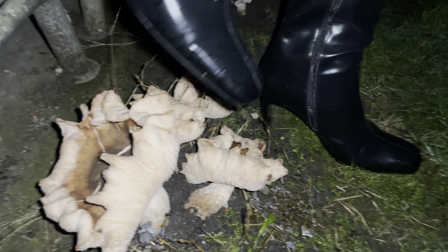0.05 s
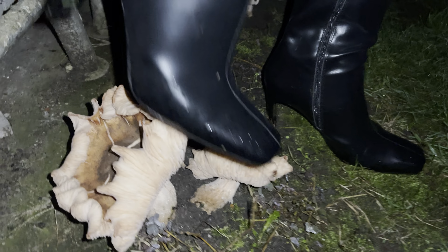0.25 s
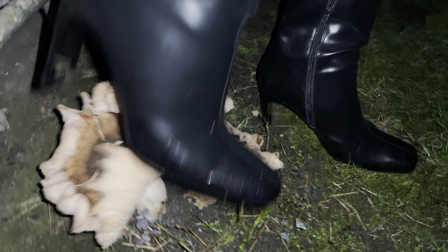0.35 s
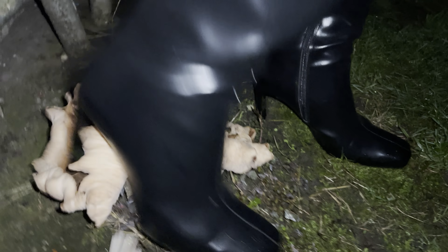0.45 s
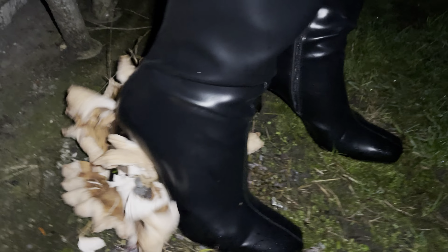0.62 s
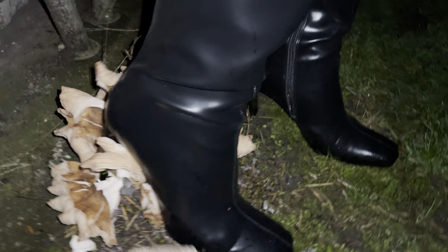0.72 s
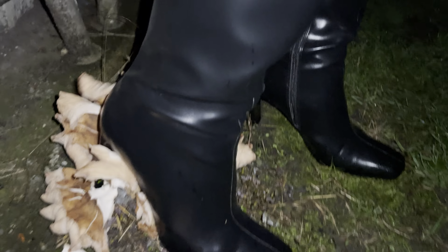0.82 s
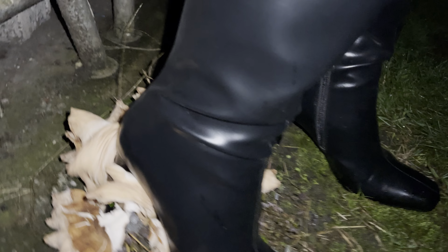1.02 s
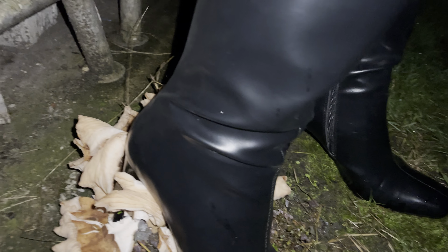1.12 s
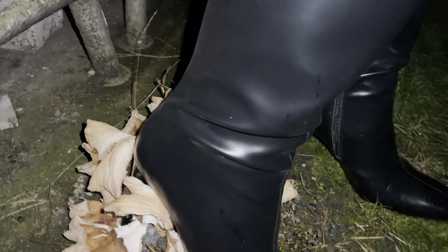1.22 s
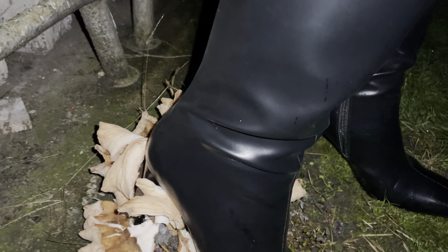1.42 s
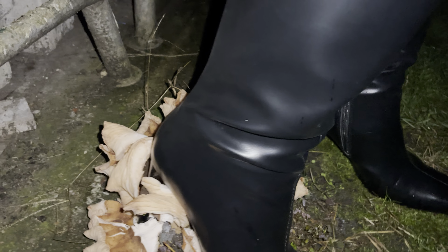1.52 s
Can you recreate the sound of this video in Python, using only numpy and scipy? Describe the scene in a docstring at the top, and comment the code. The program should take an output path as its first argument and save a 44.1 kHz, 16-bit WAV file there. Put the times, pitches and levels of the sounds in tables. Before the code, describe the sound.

One close boot step squashes mushrooms with a juicy, popping crunch. A light rustle of clothing comes first, and stalks and grit tick as the foot settles, with a faint outdoor rumble and hum underneath.

```python
"""Leather and cloth rustle over a low outdoor rumble and hum as a boot swings in, close by.
The sole touches a clump of big soft mushrooms, then the full weight crushes them: flesh tears in a
dense wet crunch, juice squelches in tiny bubbles, and caps burst with dull pops of trapped air.
The weight thuds into the soil, stalks and grit snap as the foot settles, and walls echo faintly."""
import sys
import numpy as np
from scipy import signal
from scipy.fft import rfft, irfft, next_fast_len
from scipy.io import wavfile

SR = 44100
rng = np.random.default_rng(int(sys.argv[2]) if len(sys.argv) > 2 else 0)


def file_out(sig):
    """Save sig as 16-bit WAV at sys.argv[1]."""
    # one column per channel
    cols = np.atleast_2d(sig).T
    # limit, then scale
    lim = np.clip(cols, -1, 1)
    pcm = np.round(lim * 32767).astype(np.int16)
    wavfile.write(sys.argv[1], SR, pcm)


N = 68355
TIME = np.arange(N) / SR


def from_db(db):
    """Decibels to gain."""
    return 10 ** (np.asarray(db) / 20)


def unit_rms(x):
    """Scale to rms 1."""
    return x / np.sqrt(np.mean(x ** 2) + 1e-20)


def fader(rows):
    """Gain ride through (seconds, dB) points."""
    return from_db(np.interp(TIME, *np.transpose(rows)))


def equalise(x, curve, phase=None):
    """Filter by a smooth (Hz, dB) curve, and optionally a (Hz, radians) one."""
    size = next_fast_len(N + 4096)
    log_hz = np.log(np.maximum(np.arange(size // 2 + 1) * SR / size, 1))

    def per_bin(rows):
        hz, values = np.transpose(rows)
        return np.interp(log_hz, np.log(hz), values)

    gain = from_db(per_bin(curve)) * (1 if phase is None else np.exp(1j * per_bin(phase)))
    return irfft(rfft(x, size) * gain, size)[..., :N]


def band(x, hz, width):
    """Band-pass around hz, scaled to rms 1; width is roughly a share of hz."""
    edges = np.clip(hz * np.exp(np.array([-.5, .5]) * width), 10, SR * .49)
    bandpass = signal.butter(2, edges, "band", fs=SR, output="sos")
    return unit_rms(signal.sosfilt(bandpass, x + 1e-18))


def drift(rate_hz):
    """Slow random wander with a spread of 1."""
    hop, warm_up = 40, 2000
    pole = np.exp(-2 * np.pi * rate_hz * hop / SR)
    noise = rng.standard_normal(N // hop + warm_up + 2)
    slow = signal.lfilter([1], [1, -2 * pole, pole * pole], noise)[warm_up:]
    return np.interp(np.arange(N) / hop, np.arange(len(slow)), unit_rms(slow))


def grains(per_s, spread_db=4):
    """Random clicks of very uneven size, at rms 1."""
    sizes = from_db(spread_db * np.minimum(rng.exponential(1, N), 4))
    signs = rng.choice([-1, 1], N)
    return unit_rms(sizes * signs * (rng.random(N) < per_s / SR))


def strike(start, rise_s, t60_s):
    """Envelope with a fast attack and an exponential tail."""
    age = np.maximum(TIME - start, 0)
    return (1 - np.exp(-age / rise_s)) * from_db(-60 * np.minimum(age / t60_s, 4))


def ring(start, hz, cycles, rise_s):
    """A damped tone that falls 60 dB in the given number of cycles."""
    return strike(start, rise_s, cycles / hz) * np.sin(2 * np.pi * hz * (TIME - start))


def stereo(mid, side, width):
    """Left and right from mid and side, with the side shaped by the width curve."""
    return mid + equalise(side, width) * np.array([[1], [-1]])


# The leg swings in. Each row: time in seconds, level in dB.
SWING_RIDE = [(0, -70.5), (0.025, -61.5), (0.052, -58), (0.072, -63.5), (0.150, -62), (0.215, -62),
              (0.285, -70.5), (0.420, -120)]
# Soft, mid-heavy leather and cloth. Each row: frequency in Hz, relative level in dB.
RUSTLE_EQ = [(150, 3.5), (500, 3), (800, 0.5), (1400, 4.5), (3000, -1), (5000, -7.5), (7000, -12.5),
             (9000, -6), (11500, -19), (13000, -85)]
# Wide image for rustle and rumble. Each row: frequency in Hz, side gain in dB.
WIDE_IMAGE = [(60, -24.5), (130, -16), (270, -6.5), (600, -2), (2500, -2), (9000, -3), (11500, 7.5)]


def rustle():
    """The boot shaft and clothes rub in one smooth sweep of noise."""
    rubbing = unit_rms(equalise(rng.standard_normal((2, N)), RUSTLE_EQ))
    return stereo(*(fader(SWING_RIDE) * rubbing), WIDE_IMAGE)


# Bass-heavy distant rumble. Each row: frequency in Hz, relative level in dB.
RUMBLE_EQ = [(15, -42), (30, -17), (52, 3.5), (75, -2), (100, -0.5), (150, -9), (220, -17), (275, -18.5),
             (330, -30), (600, -36), (1100, -40.5), (2300, -55.5), (4000, -59), (7000, -58), (9000, -52),
             (12500, -60.5)]
# Two low hum tones. Each row: pitch in Hz, level in dB before the ride.
HUM_TONES = [(59, -52.5), (122, -59.5)]
# Rumble and hum swell and sink together. Each row: time in seconds, gain in dB.
BED_RIDE = [(0, -3), (0.22, 1), (0.35, -2), (0.55, -0.5), (0.95, 0), (1.04, -5.5), (1.11, 0), (1.35, -2),
            (1.55, -3.5)]


def rumble_and_hum(rumble_db=-50, waver=0.17):
    """A bed of far rumble, with a low hum that wavers in level and phase."""
    noise = unit_rms(equalise(rng.standard_normal((2, N)), RUMBLE_EQ))
    bed = from_db(rumble_db) * stereo(*noise, WIDE_IMAGE)
    for hz, db in HUM_TONES:
        amplitude = from_db(db) * np.sqrt(2) * (1 + waver * drift(rate_hz=15))
        bed += amplitude * np.sin(2 * np.pi * hz * TIME + drift(rate_hz=3.4))
    return fader(BED_RIDE) * bed


# Flesh tears at the first touch of the sole. Each row: time in seconds, level in dB.
TOUCH_RIDE = [(0.285, -70.5), (0.312, -54.5), (0.345, -48.5), (0.364, -43), (0.372, -40), (0.397, -40.5),
              (0.406, -51.5), (0.436, -56.5)]
# The full weight lands, then the foot settles. Each row: time in seconds, level in dB.
WEIGHT_RIDE = [(0.464, -46), (0.476, -35), (0.502, -36), (0.515, -39.5), (0.546, -41), (0.56, -49.5),
               (0.620, -57.5), (0.690, -61.5), (0.750, -65.5), (0.800, -76.5), (0.890, -74), (0.975, -70.5),
               (1.050, -78.5), (1.100, -80.5), (1.169, -99.5), (1.550, -100)]
# Full body with a wet sheen on top. Each row: frequency in Hz, relative level in dB.
CRUNCH_EQ = [(100, 0), (300, -2.5), (650, -1.5), (1200, -0.5), (1900, -4), (2800, -6.5), (4100, -7),
             (5200, -10), (7000, -11), (8800, -5), (10000, -7), (11400, -4), (13000, -23.5)]
# Tighter image for the sounds underfoot. Each row: frequency in Hz, side gain in dB.
CLOSE_IMAGE = [(60, -28), (160, -16), (400, -8), (700, -0.5), (1700, -17.5), (4500, -10.5), (7500, -4.5),
               (12500, -3.5)]


def crunch(tears_per_s=6000, fizz_share=0.49, clump_db=1.6):
    """Countless small tears come in clumps over a wet fizz; both follow the pressure of the sole."""
    clumps = unit_rms(from_db(clump_db * drift(rate_hz=80)))
    pressure = fader(TOUCH_RIDE + WEIGHT_RIDE) * clumps
    mid_side = []
    for _ in range(2):
        tears = np.sqrt(1 - fizz_share) * grains(tears_per_s)
        fizz = np.sqrt(fizz_share) * rng.standard_normal(N)
        mid_side.append(pressure * unit_rms(equalise(tears + fizz, CRUNCH_EQ)))
    return stereo(*mid_side, CLOSE_IMAGE)


# Squirts of juice. Each row: crest time in seconds, level in dB, pitch in Hz, half-length in seconds.
JUICE_SQUIRTS = [(0.315, -54, 1385, 0.011), (0.329, -50, 1300, 0.0084), (0.367, -50, 1300, 0.02),
                 (0.392, -51, 1204, .008), (0.466, -44, 1700, 0.0065), (0.499, -39.5, 3950, .005),
                 (0.518, -40.5, 1866, .02), (0.567, -48, 1856, 0.0059), (0.585, -50, 1950, 0.0063),
                 (0.868, -66.5, 1690, 0.0077), (1.04, -72, 916, 0.012), (1.095, -80.5, 1705, 0.026)]


def squelches(bubbles_per_s=2700):
    """Juice squeezes out in short swells of tiny bubbles, each swell at its own pitch."""
    mid_side = 0
    for crest, db, hz, half_length in JUICE_SQUIRTS:
        clicks = np.array([grains(bubbles_per_s), grains(bubbles_per_s)])
        swell = np.exp(-((TIME - crest) / half_length) ** 2)
        mid_side += from_db(db) * swell * band(clicks, hz, width=0.33)
    return stereo(*mid_side, CLOSE_IMAGE)


# Caps give way in quick flurries. Each row: start in seconds, level in dB, pitch in Hz.
CAP_BURSTS = [(0.3689, -29.5, 1100), (0.3716, -25.5, 680), (0.375, -29, 1050), (0.3785, -31.5, 720),
              (0.3925, -23.5, 1110), (0.4715, -33, 513), (0.4778, -25.5, 700), (0.484, -18, 810),
              (0.4850, -20.5, 1600), (0.4880, -27, 1300), (0.494, -28, 1660), (0.512, -25.5, 559.6),
              (0.5132, -20, 620), (0.5140, -27.5, 1903), (0.5172, -34, 422), (0.5250, -36, 600),
              (0.537, -35, 526), (0.6740, -46.5, 650)]


def pops(splat_db=-13, rise_s=0.0003):
    """Each cap bursts with a few cycles of trapped air and a short splat around the same pitch."""
    mid, side = 0, 0
    for start, db, hz in CAP_BURSTS:
        noise = band(rng.standard_normal((2, N)), hz, width=0.94)
        splat_mid, splat_side = from_db(splat_db) * strike(start, rise_s, t60_s=0.048) * noise
        air = ring(start, hz, cycles=6.8, rise_s=rise_s)
        mid += from_db(db) * (air + splat_mid)
        side += from_db(db) * splat_side
    return stereo(mid, side, CLOSE_IMAGE)


# The low end of the step. Each row: start in seconds, level in dB, pitch in Hz.
SOIL_THUDS = [(0.37, -34.5, 216), (0.401, -36, 96), (0.469, -31, 85), (0.486, -31, 199.4),
              (0.516, -30, 173)]


def thuds():
    """The weight reaches the soil in soft, quickly damped pushes."""
    return sum(from_db(db) * ring(start, hz, cycles=6.8, rise_s=0.0022) for start, db, hz in SOIL_THUDS)


# Crisp accents. Each row: start in seconds, level in dB, band centre in Hz, seconds to fall 60 dB.
STALK_SNAPS = [(0.4445, -38.5, 10800, 0.036), (0.45, -47, 8500, 0.013), (0.4481, -42.5, 2700, .015),
               (0.7005, -47, 10260, 0.033), (0.7, -51.5, 1200, 0.033), (0.701, -62, 3080, 0.018),
               (0.7190, -49, 9400, 0.0045), (0.81, -57, 11100, 0.016), (0.865, -62.5, 9700, 0.027),
               (0.9220, -59.5, 650, 0.032), (0.9238, -52, 1670, 0.023), (0.9235, -58, 3730, 0.026),
               (0.923, -53, 7960, 0.023), (0.933, -69, 6900, 0.075), (0.9845, -58.5, 8200, 0.02),
               (1.001, -50, 8340, 0.0046)]


def snaps():
    """Stalks and grit break under the foot in brief, mostly bright cracks of noise."""
    mid_side = 0
    for start, db, hz, t60_s in STALK_SNAPS:
        noise = band(rng.standard_normal((2, N)), hz, width=0.55)
        mid_side += from_db(db) * strike(start, rise_s=0.0007, t60_s=t60_s) * noise
    return stereo(*mid_side, CLOSE_IMAGE)


# Each band leans to one side. Each row: frequency in Hz, left minus right in dB.
PORT_BALANCE = [(100, -1), (250, 5), (420, -3), (670, -4), (1080, 3), (1750, -2), (2840, -2), (7500, -2),
                (12000, 0.5)]
# Phase between the ports. Each row: frequency in Hz, lead of the left in radians.
PORT_LEAD = [(100, -1), (430, 0), (860, 0.2), (1380, 0.71), (2670, 0.63), (5000, 0.5), (7500, 0.97),
             (8900, -0.6), (10000, 2.9), (10800, 2), (12500, 3)]


def microphone_ports(source):
    """The two microphone ports hear a close source with different level and phase."""
    return np.array([equalise(channel, np.array(PORT_BALANCE) * half, np.array(PORT_LEAD) * half)
                     for channel, half in zip(source, ([1, .5], [1, -.5]))])


# The walls return mostly mids. Each row: frequency in Hz, gain in dB.
WALL_EQ = [(100, -15.5), (400, -2.5), (1500, -4), (4000, -6.5), (12000, -13.5)]


def wall_echo(source, send_db=-14.5, t60_s=0.35):
    """Nearby walls scatter each channel into a short, diffuse tail."""
    tails = []
    for channel in source:
        response = rng.standard_normal(N) * strike(0, t60_s / 20, t60_s)
        response /= np.sqrt(np.sum(response ** 2))
        tails.append(signal.fftconvolve(channel, response)[:N])
    return from_db(send_db) * equalise(np.array(tails), WALL_EQ)


def scene():
    """The close tread and its faint echo, mixed with the rustle and the low bed."""
    tread = microphone_ports(crunch() + pops() + squelches() + snaps() + thuds())
    return tread + wall_echo(tread) + rustle() + rumble_and_hum()


def record(dry, low_cut_hz=48, notch_hz=10320, notch_width_hz=450, high_cut_hz=12700):
    """The microphone drops the deep bass and has a narrow treble notch; the top is cut steeply."""
    low_cut = signal.butter(2, low_cut_hz, "high", fs=SR, output="sos")
    notch_edges = [notch_hz - notch_width_hz / 2, notch_hz + notch_width_hz / 2]
    notch = signal.butter(2, notch_edges, "bandstop", fs=SR, output="sos")
    high_cut = signal.ellip(10, .3, 70, high_cut_hz, fs=SR, output="sos")
    return signal.sosfilt(np.vstack([low_cut, notch, high_cut]), dry)


dry = scene()
out = record(dry)
file_out(out)
```